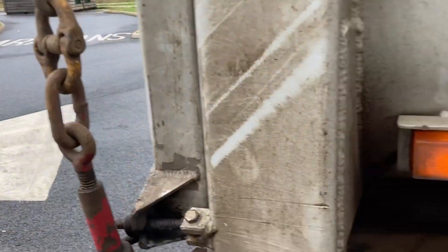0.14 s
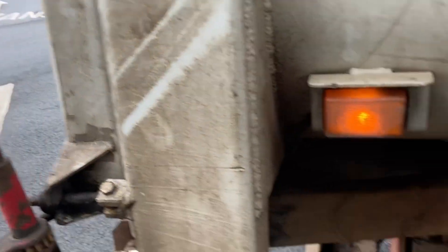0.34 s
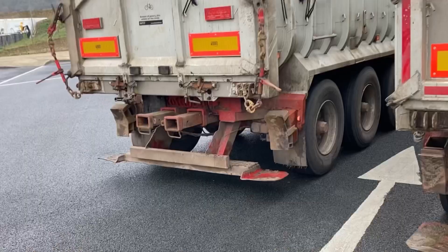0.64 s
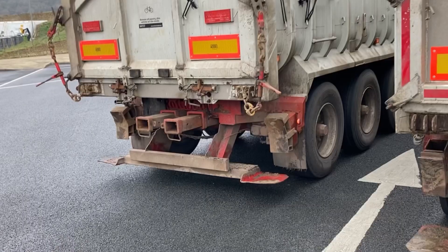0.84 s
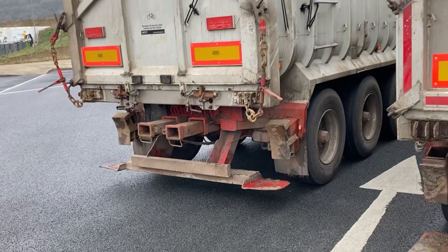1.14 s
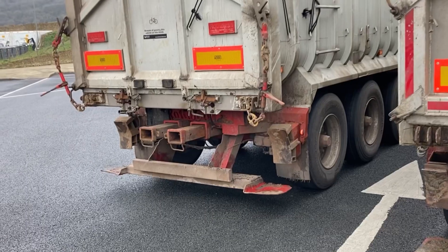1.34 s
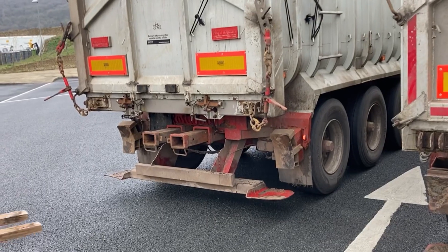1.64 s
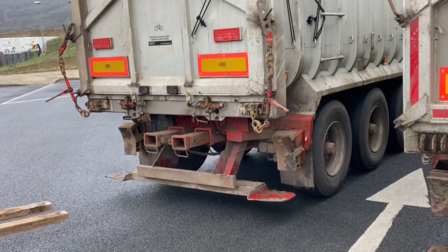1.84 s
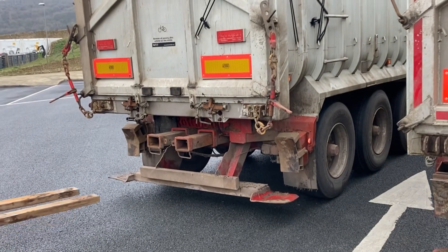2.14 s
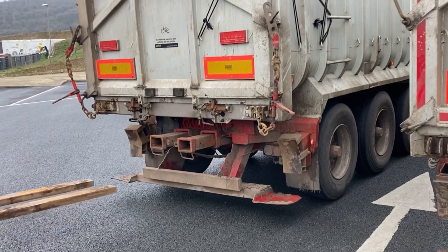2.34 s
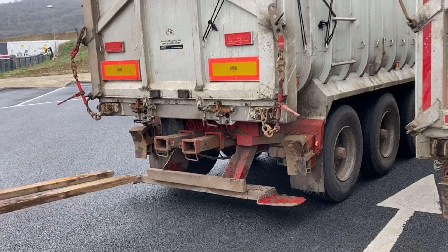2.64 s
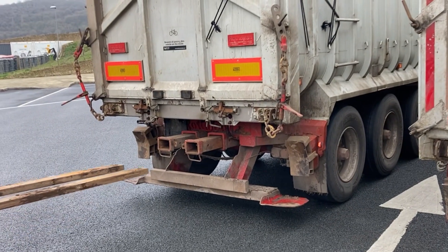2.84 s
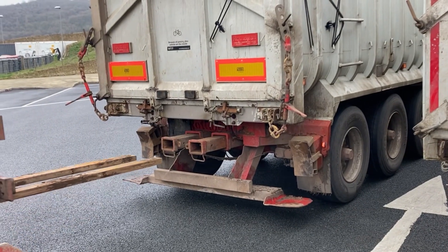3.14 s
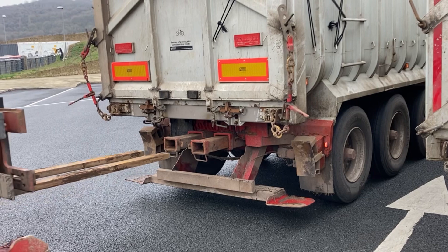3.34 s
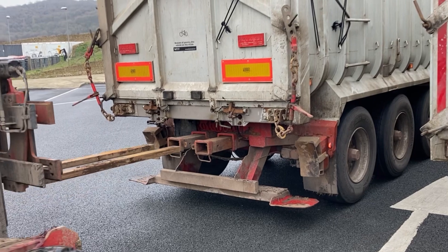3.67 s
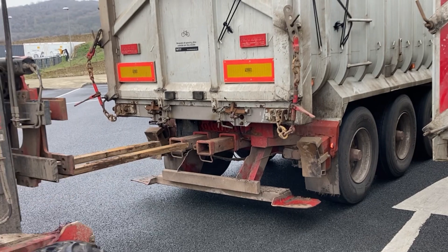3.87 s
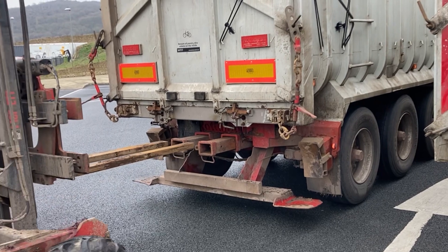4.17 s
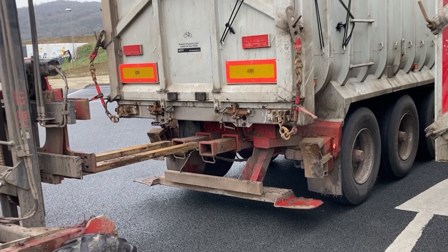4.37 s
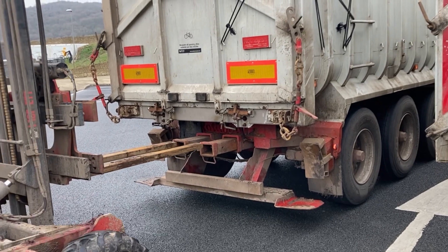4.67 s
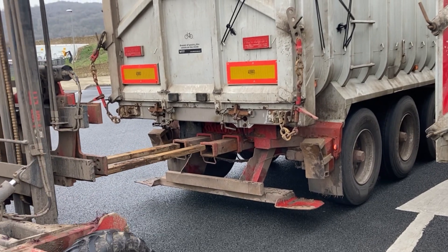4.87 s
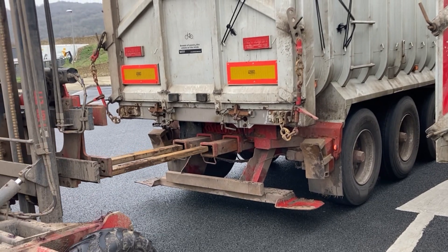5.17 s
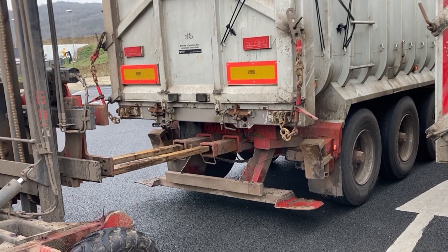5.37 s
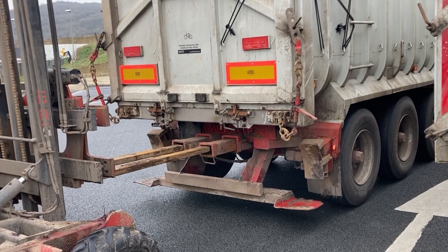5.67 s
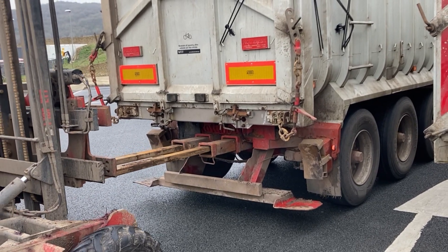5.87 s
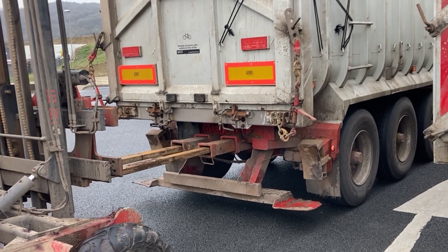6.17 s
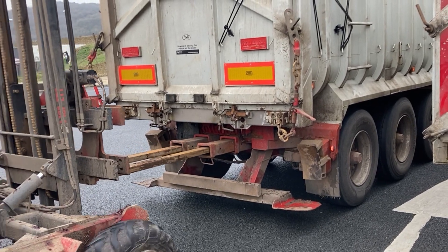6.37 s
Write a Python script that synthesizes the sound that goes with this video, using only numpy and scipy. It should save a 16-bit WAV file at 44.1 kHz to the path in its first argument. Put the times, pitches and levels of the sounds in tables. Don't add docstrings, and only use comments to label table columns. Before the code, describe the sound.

Dull steel knocks over muffled rumble cut abruptly to a close diesel forklift droning outdoors, nearing, slowing under load with whining hydraulics, then revving up.

```python
import sys
import numpy as np
from scipy import signal
from scipy.fft import rfft, irfft, next_fast_len
from scipy.io import wavfile
from scipy.ndimage import uniform_filter1d

SR = 44100
rng = np.random.default_rng(int(sys.argv[2]) if len(sys.argv) > 2 else 0)


def undo_db(level):
    steps = np.asarray(level, float) / 20
    return 10 ** steps


def wav_record(signal):
    frames = np.transpose(np.atleast_2d(signal))
    bounded = np.clip(frames, -1, 1)
    quanta = np.round(bounded * 32767).astype(np.int16)
    wavfile.write(sys.argv[1], SR, quanta)


N = 287091
T = np.arange(N) / SR
HOP, FRAME = 256, 1024

CUT_S, FADE_IN_S = .609, .024
CROSS_HZ, EDGE_HZ = 7000, 15800
MEAN_RATE = 50
THROTTLE_S, THROTTLE_RISE_S = 5.97, .13
LIFT_EDGE_S, PUMP_LAG_S, HOUSING_SHARE = .09, 0.13, 0.31
LUG_RATE, LUG_DB = 43.2, 3.3
THIRD_TURN, THIRD_FROM_RATE = .07, 45
MOUNT_WAVER_DB, BODY_WAVER_DB = 2.5, .6
FRAME_DB, FRAME_PEAK_DB, FRAME_RATE, FRAME_SPREAD = -55, 18.5, 46, 7.6
FAR_BASS_DB, FAR_MIDDLE_DB, LUMP_S = -25.5, -21, 0.0062
FLICKER_HZ, FLICKER_WIDTH_HZ, FLICKER_T60, FLICKER_DB = 13900, 4000, .04, 6
CLATTER_HZ, CLATTER_WIDTH_HZ, CLATTER_T60, CLATTER_DB = 2390.3, 1600, .06, -6.5

# frequency in Hz, level in dB per Hz.
FAR_COLOUR = [(25, -29), (31, -20), (35, -12), (45, 1.5), (78, -0.5), (158, -11.5), (1000, -29),
              (2492, -35), (5317, -52), (7767, -53.5), (9000, -51), (9900, -56.5), (12300, -65),
              (13500, -66), (14700, -65), (15300, -62), (15900, -97)]
# start in seconds, level in dB, pitch in Hz, t60 in seconds.
KNOCKS = [(0.059, -15.5, 95, 0.14), (.17, -21, 192, 0.10124), (0.226, -17, 250, 0.047),
          (.28, -34.5, 783, 0.24), (0.325, -23, 185.3, 0.12), (0.329, -30, 349, 0.65),
          (0.496, -24, 131.4, 0.19), (.028, -26, 353, 0.14), (.052, -31, 240, .08), (.103, -24, 190, 0.065),
          (0.509, -20.5, 262, 0.1), (0.557, -28, 181.1, 0.062)]
# time in seconds, swell in dB.
LUMPS = [(.024, 12), (0.145, 12), (.318, 9), (.5, 9), (.565, 7)]
# frequency in Hz, lead in half turns.
LEAD = [(0, 0), (260, .14), (520, .34), (800, .35), (1050, .53), (1550, 1), (2880, 2.93), (3060, 3.07),
        (3200, 3.3), (3620, 3.93), (4300, 4.1), (4800, 4.92), (5600, 5.07), (6050, 5.8), (6400, 6),
        (9000, 6.1)]
# frequency in Hz, lead in half turns.
TOP_LEAD = [(7000, 0), (7500, -.06), (8450, -.93), (9450, -1.05), (10900, -1.9), (11700, -2.05),
            (13050, -2.93), (14350, -3.07), (15100, -3.9), (16000, -4)]
# time in seconds, lead stretch as a ratio,
# share of the upper middle coming straight rather than scattered off the lorry [0-1].
BEARING = [(0, .7, .5), (1.2, .7, .5), (2, .9, .5), (2.8, 1.05, .55), (3.5, 1, .85), (4.2, 1, 1),
           (6.51, 1, 1)]
# frequency in Hz, likeness [0-1].
FAR_SAME = [(100, 0.63), (500, 0.76), (1000, 0.25), (6000, 0.4), (7500, 0.7), (8600, .97), (15000, .97)]
# frequency in Hz, likeness [0-1].
NEAR_SAME = [(100, .99), (400, .96), (700, .88), (1100, .75), (1600, .85), (2250, .5), (2980, .97),
             (3500, .75), (4050, .96), (4500, .85), (4850, .985), (5600, .99), (6000, .85), (6350, .994),
             (7400, .99), (7900, .8), (8600, .99), (9450, .99), (10200, .8), (11000, .985), (11700, .99),
             (12400, .82), (13200, .985), (14300, .985), (15500, .9)]
# frequency in Hz, left minus right in dB.
BALANCE_DB = [(100, .2), (400, .5), (800, 3.5), (1500, .5), (3000, -.3), (15000, 0)]
# start in seconds, length in seconds, centre in Hz, width in
# octaves, gain in dB.
BAND_SWELLS = [(0.253, 0.071, 220, 0.5696, -10), (0.37, 0.064, 250, 0.3004, -9), (0.73, 1, 270, 0.22, -8.5),
               (0.61, 1.1, 164.6, 0.15, 2.5), (1.77, 0.44, 164, 0.44, -5), (2.5314, 0.787, 156, 0.16, -6),
               (1.84, 1.6, 460, .2, -2.5), (2.59, 0.68, 260, 0.57, 3.5), (3.7, 0.22, 230, 0.55, 4),
               (3.98, 0.97, 396, 0.094, -10), (5.1, 0.49, 407, 0.11, -22), (7.6, 0.48, 170, 0.11, 5),
               (5.2, 0.3, 268, 0.26, -5.5), (1.1, 0.6626, 1370, 0.25, 3.5), (0.639, 0.7425, 880, 0.18, -2),
               (6.1, 0.5, 410, 0.19, -5), (0.82, 1.845, 2700, 0.1045, 1), (0.38, 1.7, 4200, 0.081, 1.5),
               (0.44, 1.2, 3500, .12, -1), (4, 2.8, 2260, 0.06875, -5.5), (4.7, 0.67, 13371, 0.2664, 0.5),
               (2.06, 0.547, 1090, 0.2093, 4.5), (2.35, 0.42, 550, 0.1945, -1.5), (3.6, .5, 240, 0.2, 2),
               (1.0, 0.58, 250, 0.0874, 8), (2.9, 3, 8500, 0.046, 6), (.62, 1.33, 440, 0.2, 4),
               (4.6, 0.53, 324, .15, 0), (3.6, 0.4, 420, 0.25, -4.5), (3.03, 0.43, 870, 0.1205, 3.5),
               (1.9, 1.2, 148, .08, 2), (4.37, 0.4, 360, 0.22, -4), (4.3, 0.47, 276, 0.4, 1.5),
               (3.8, .35, 280, 0.19, -3), (6.2, .4, 560, 0.12, -1), (5.85, 0.18, 310, 0.18, 3.5),
               (.6, .12, 55, .3, -5), (2.2, 0.22, 62, 0.33, -6), (.62, 0.55, 4400, .1, 2),
               (6.0, 0.272, 750, .3, 1.5), (2.6, 0.67, 1150, .25, 3.5), (1.14, 0.61, 735.8, 0.14, 5)]
# time in seconds, rate in firings a second.
SPEED = [(0.62, 57.1), (0.85, 57.1), (0.97, 55.5), (1.25, 54.1), (1.9, 52.5), (2.25, 51.6), (2.63, 50.6),
         (3.04, 50.3), (3.62, 45.8), (3.92, 45.5), (4.21, 43.5), (4.54, 44.5), (4.83, 43.3), (5.09, 45.0),
         (5.31, 40.2), (5.55, 41.2), (5.95, 45.5), (6.29, 56.0), (6.5, 57.3)]
# time in seconds, nearness [0-1].
NEARNESS = [(.62, 0), (.78, 0.08), (1.3, 0.24), (1.9, 0.54), (2.6, 0.75), (3.2, 0.87), (4.5, 0.87),
            (6.5, 0.91)]
# frequency in Hz, level in dB.
PIPE = [(40, -32), (44.5, -33), (49, -24.5), (57, -20.5), (80, -20), (114, -21), (130, -26.5), (230, -52.5)]
# frequency in Hz, level in dB.
HOSE = [(180, -37.5), (218, -26), (240, -35.5), (257, -36.5), (283, -31.5), (302, -31.5), (318, -34.5),
        (342, -33.5)]
# frequency in Hz, level in dB.
HOUSING = [(560, -45), (598, -43.5), (622, -37.5), (645, -46), (690, -47)]
# own level in dB, gain when near in dB, gain on throttle in dB, waver in dB.
ORDER_RULES = [
    (1.2, 2.5, 2, 0.1),
    (6, -8, 8, -1.5),
    (-6, 0, 15, 2),
    (1, 4, 1.5, -0.25),
    (-1.5, 3.5, 13, 1.5),
    (-1, -2.3, 4, -0.4),
    (2.5, -0.3, 7, -0.5),
]
# start in seconds, length in seconds, beats a second, depth in dB.
STUMBLES = [(3.953, 0.3997, 13, 3.5), (4.47, 0.46, 12, 1), (5.11, 0.78, 10.6, 1)]
# start in seconds, length in seconds, gain in dB.
LIFTS = [(0.546, 0.41, 10), (1.084, 0.1, 12.5), (1.8, 1.44, 12.5), (6.1, 0.13, 18), (6.292, .4, 10)]
MOUNT_ORDERS = (1.5, 5, 7, 7.5, 8, 9)
# level at the mean rate in dB, slope in dB per firing a second,
# gain when near in dB, gain when facing in dB, gain on throttle in dB.
MOUNT_RULES = [(-43, .7, 0.4885, .1, .1), (-50, .05, 11.5, .1, .1), (-42.5, .05, 6, .1, .1),
               (-47.5, .05, 7, .1, 1), (-46.5, .1, 2, .1, 1), (-40, 0.29, -11, .1, 2)]
CYLINDERS_DB = [0.58, 0.75, -1.4, -0.29]
# frequency in Hz, level in dB per Hz.
BLOCK = [(25, -16), (38, -26), (50, 4.5), (110, -5), (220, -4), (310, 0), (370, -4.5), (480, -11.5),
         (800, -12), (1050, -16), (3000, -23.5), (6000, -31.5), (11000, -32), (15000, -40)]
ROAR_AT_HZ = (230, 700, 2000, 7000)
# the five columns of the mount levels, in dB and dB per firing a second.
ROAR_RULES = [
    (-33, -0.06, 2.5, -1.2, 2.6),
    (-34.5, 0.33, 7.5, 1.74, 2),
    (-33.5, 0.2, 5.5, -0.15, 3),
    (-49, 0.23, 5.5, 2.5, 1.5),
]
ROAR_WAVER_DB = (0.7, 0.25, .4, 0.3)
# frequency in Hz, width in Hz.
BODY_MODES = [
    (435, 190),
    (880, 55),
    (333, 16),
]
# the five columns of the mount levels, in dB and dB per firing a second.
BONNET_RULE = (-27, -0.76, -3.5, -19.5, 8)
# the same columns, in dB and dB per firing a second.
PANEL_RULE = (-47, 1, 0.5, 18, -3)
# frequency in Hz, width in Hz.
TICK_MODES = [
    (9600, 200),
    (10050, 500),
    (12350, 800),
]
# the five columns of the mount levels, in dB and dB per firing a second.
TICK_RULES = [
    (-61, .1, 5, 3, 12),
    (-52, .1, 9.8, -5.5, 9.3),
    (-65, -0.1153, 27, 0.5, 1.4),
]
# time in seconds, level in dB.
CLATTER = [(1.962, -20.5), (2.1146, -24), (2.1914, -24), (2.2518, -24), (2.3995, -29), (3.042, -27),
           (3.1373, -27), (3.3011, -21), (3.4715, -21), (3.5364, -25), (3.7075, -26), (3.7973, -22),
           (4.0557, -31), (4.2702, -23), (4.4478, -22), (5.0774, -23), (5.1497, -25), (5.3707, -21),
           (5.468, -26), (5.912, -27), (6.0197, -22), (6.0896, -22)]
# time in seconds, level in dB.
FLICKERS = [(5.0973, -52), (5.1617, -50), (5.2759, -48), (5.4535, -51), (5.5717, -51), (5.6955, -48),
            (5.7578, -46)]


def evened(x):
    return x / np.sqrt(np.mean(abs(x) ** 2) + 1e-20)


def read(points, hz):
    f, value = np.transpose(points)
    return np.interp(np.log(hz + 1), np.log(f + 1), value)


def curves(rows, t):
    s, *columns = np.transpose(rows)
    return [np.interp(t, s, c) for c in columns]


def drift(width, channels=1):
    noise = rng.standard_normal((channels, N))
    return evened(uniform_filter1d(uniform_filter1d(noise, width), width))


def coloured(points):
    size = next_fast_len(N)
    gain = undo_db(read(points, np.fft.rfftfreq(size, 1 / SR)))
    return evened(irfft(rfft(rng.standard_normal((2, size))) * gain, size)[:, :N])


def frames(x):
    return signal.stft(x, SR, nperseg=FRAME, noverlap=FRAME - HOP)


def joined(z):
    return signal.istft(z, SR, nperseg=FRAME, noverlap=FRAME - HOP)[1][..., :N]


def spell(t, start, length, edge):
    return np.clip(np.minimum(t - start, start + length - t) / edge + .5, 0, 1)


def ring(x, hz, width):
    b, a = signal.iirpeak(hz, hz / width, SR)
    return evened(signal.lfilter(b, a, signal.lfilter(b, a, x)))


def strikes(events, gain_db, t60):
    return sum(undo_db(db + gain_db - 60 * np.clip(T - s, 0, None) / t60) * (T >= s) for s, db in events)


def ports(pair, same, side, tones=0):
    hz, t, z = frames(pair)
    line = frames(tones + np.zeros(N))[2]
    stretch, straight = curves(BEARING, t)
    hz_column = hz[:, None]
    upper_middle = (hz_column > 2600) & (hz_column < CROSS_HZ)
    just_above = hz_column // 700 == 10
    direct = np.where(upper_middle, straight, np.where(just_above, straight ** .07, 1))
    alike = np.clip(read(same, hz), 0, 1)[:, None] * direct
    knee = LEAD[5][0]
    seen_hz = np.where(hz_column > knee, knee + (hz_column - knee) * stretch, hz_column)
    low = side * np.interp(seen_hz, *np.transpose(LEAD))
    high = np.interp(hz_column, *np.transpose(TOP_LEAD))
    lead = np.pi * np.where(hz_column < CROSS_HZ, low, high)
    tilt = undo_db(side * read(BALANCE_DB, hz)[:, None] / 2)
    right = (alike * z[0] + np.sqrt(1 - alike ** 2) * z[1] + line) * np.exp(-1j * lead)
    return joined(np.array([(z[0] + line) * tilt, right / tilt]))


def far_shot():
    hz, t, z = frames(coloured(FAR_COLOUR))
    bass_db = FAR_BASS_DB + sum(db * np.exp(-((t - s) / LUMP_S) ** 2) for s, db in LUMPS)
    upper = np.clip(np.log2((hz + 1) / 150), 0, 1)[:, None]
    out = joined(z * undo_db((1 - upper) * bass_db + upper * FAR_MIDDLE_DB))
    for s, db, pitch_hz, t60 in KNOCKS:
        u = np.clip(T - s, 0, None)
        phase = 2 * np.pi * pitch_hz * u
        wave = np.sin(phase) + 0.41 * np.sin(2.3 * phase) + 0.3 * np.sin(1.7 * phase)
        out[0] += undo_db(db - 60 * u / t60) * wave * (1 - np.exp(-u / 0.00063))
    return ports(out, FAR_SAME, -0.71)


def band_swells(x):
    hz, t, z = frames(x)
    field_db = 0
    for s, length, at_hz, width, db in BAND_SWELLS:
        band = np.exp(-(np.log2((hz[:, None] + 1) / at_hz) / width) ** 2)
        field_db = field_db + db * band * spell(t, s, length, 0.302 * length)
    return joined(z * undo_db(field_db))


def crank():
    return np.cumsum(curves(SPEED, T)[0] * (1 + .002 * drift(900)[0])) / SR + .28


def controls(t):
    off = curves(SPEED, t)[0] - MEAN_RATE
    facing = 2 * curves(BEARING, t)[1] - 1
    throttle = np.clip((t - THROTTLE_S) / THROTTLE_RISE_S, 0, 1)
    return np.array([off, curves(NEARNESS, t)[0], facing, throttle])


def obey(rules, t):
    rules = np.atleast_2d(rules)
    return rules[:, :1] + rules[:, 1:] @ controls(t)


def order_levels():
    off, near, _, throttle = controls(T)
    rate, late = off + MEAN_RATE, controls(T - PUMP_LAG_S)[3]
    load_db = sum(db * spell(T, s, length, LIFT_EDGE_S) for s, length, db in LIFTS)
    pipe = [read(PIPE, k * rate) for k in (1, 3, 4, 2)]
    pump = [read(HOSE, 4.5 * rate), read(HOSE, 6 * rate), read(HOUSING, 12 * rate)]
    own, near_db, throttle_db, waver_db = np.transpose(ORDER_RULES)[:, :, None]
    pedal = np.array([throttle, throttle, late, throttle] + [late] * len(pump))
    levels = pipe + pump + own + near_db * near + throttle_db * pedal
    levels = levels + waver_db * drift(2500, channels=7)
    levels[5:] += np.outer([1, HOUSING_SHARE], load_db)
    levels[2] += LUG_DB * np.clip(LUG_RATE - rate, 0, None)
    for start, length, beats, depth_db in STUMBLES:
        u = np.clip(T - start, 0, length)
        levels[3] -= depth_db * np.sin(np.pi * u / length) ** .5 * np.sin(2 * np.pi * beats * u)
    return levels


def hum(turns):
    orders = (1, 3, 4, 2, 4.5, 6, 12)
    rate = controls(T)[0] + MEAN_RATE
    third_late = .02 - THIRD_TURN * np.clip(rate - THIRD_FROM_RATE, 0, None)
    late = (0, third_late, .57, .18, 0, .76, 0)
    return sum(np.sqrt(2) * undo_db(db) * np.cos(2 * np.pi * (k * turns - d))
               for k, d, db in zip(orders, late, order_levels()))


def mounts(turns):
    levels = obey(MOUNT_RULES, T) + MOUNT_WAVER_DB * drift(5000, channels=6)
    return sum(np.sqrt(2) * undo_db(db) * np.cos(2 * np.pi * k * turns) for k, db in zip(MOUNT_ORDERS, levels))


def firings(turns, spread_db):
    index = turns.astype(int)
    chance = np.clip(rng.standard_normal(N // 500), -2, 1.5)
    return undo_db(np.array(CYLINDERS_DB)[index % 4] + spread_db * chance[index])


def roar(turns):
    noise = coloured(BLOCK)
    hz, t, z = frames(noise)
    puffs = firings(turns, .4) * (1 + .17 * np.cos(2 * np.pi * (turns - .1)))
    share = np.clip(np.log(hz + 1) / np.log(9000), 0, 1)[:, None] ** 2.1
    z = (1 - share) * z + share * frames(noise * evened(puffs))[2]
    waver = drift(1800, channels=4)[:, np.minimum((t * SR).astype(int), N - 1)]
    trim_db = [[0], [-1], [0], [11]]
    steps = obey(ROAR_RULES, t) + np.array(ROAR_WAVER_DB)[:, None] * waver + trim_db
    place = np.interp(np.log(hz + 1), np.log(ROAR_AT_HZ), np.arange(4))
    colour_db = np.clip(1 - abs(place[:, None] - np.arange(4)), 0, 1) @ steps
    patches = rng.standard_normal(z.shape[1:])
    patches = evened(uniform_filter1d(uniform_filter1d(patches, 8, 0), 12, 1))
    return joined(z * undo_db(11.0 + colour_db + patches))


def bodywork(turns):
    blows = np.diff(np.floor(turns), prepend=0) * firings(turns, 0.411)
    shake = (2.5 + np.exp(-(turns % 1) / .2)) * rng.standard_normal((2, N))
    drive = .25 * evened(blows) + evened(shake)
    detuning = (curves(SPEED, T)[0] - FRAME_RATE) / FRAME_SPREAD
    frame_db = FRAME_DB + FRAME_PEAK_DB * np.exp(-detuning ** 2)
    levels = [obey(BONNET_RULE, T)[0], frame_db, obey(PANEL_RULE, T)[0]]
    levels = levels + BODY_WAVER_DB * drift(4000, channels=3)
    return sum(undo_db(db) * ring(drive, *mode) for mode, db in zip(BODY_MODES, levels))


def injectors(turns):
    out = np.zeros((2, N))
    swell = np.exp(-((turns + .55) % 1) / .15) + .33 * np.exp(-((turns + .05) % 1) / .15)
    for mode, db in zip(TICK_MODES, obey(TICK_RULES, T)):
        strength = .36 + firings(turns + .55, 4.5) * swell
        out += undo_db(db) * ring(strength * rng.standard_normal((2, N)), *mode)
    return out


def clatter():
    noise = rng.standard_normal((2, N))
    return strikes(CLATTER, CLATTER_DB, CLATTER_T60) * ring(noise, CLATTER_HZ, CLATTER_WIDTH_HZ)


def high_flickers():
    noise = rng.standard_normal((2, N))
    return strikes(FLICKERS, FLICKER_DB, FLICKER_T60) * ring(noise, FLICKER_HZ, FLICKER_WIDTH_HZ)


def scene():
    turns = crank()
    noises = roar(turns) + bodywork(turns) + injectors(turns) + clatter()
    near = ports(noises, NEAR_SAME, 0.96, hum(turns) + mounts(turns))
    fade_in = np.clip((T - CUT_S) / FADE_IN_S, 0, 1)
    return band_swells(np.where(T < CUT_S, far_shot(), near * fade_in)) + high_flickers()


def top_cut(x):
    return signal.sosfilt(signal.butter(12, 17110, fs=SR, output="sos"), x)


def record(dry):
    rounded = 1.6 * np.tanh(dry / 1.6)
    low_pass = signal.firwin(511, EDGE_HZ, window=("kaiser", 9), fs=SR)
    limited = signal.oaconvolve(rounded, low_pass[None], "same", axes=1)
    return top_cut(limited)


dry = scene()
out = record(dry)
wav_record(out)
```